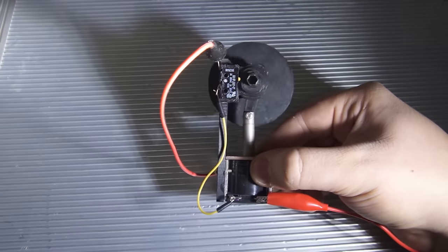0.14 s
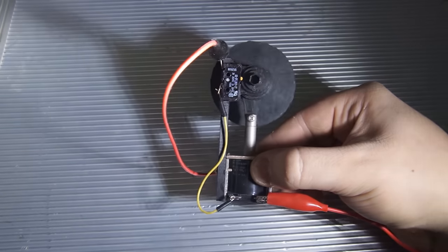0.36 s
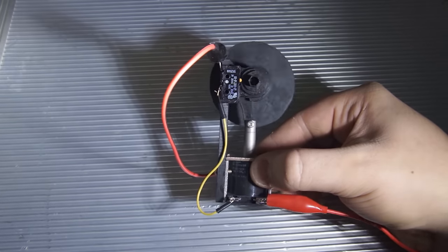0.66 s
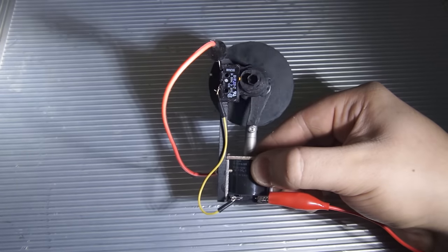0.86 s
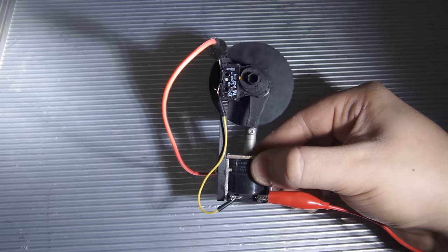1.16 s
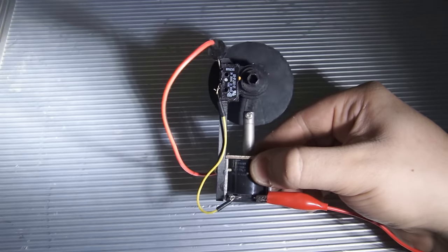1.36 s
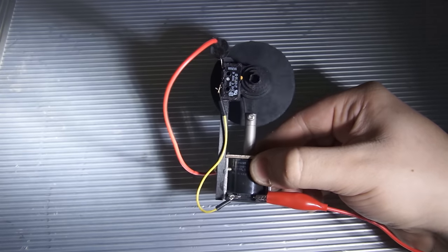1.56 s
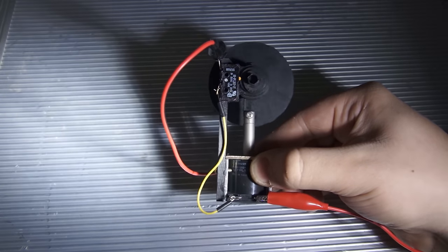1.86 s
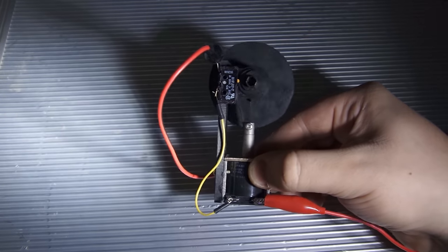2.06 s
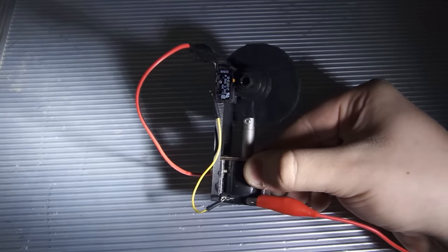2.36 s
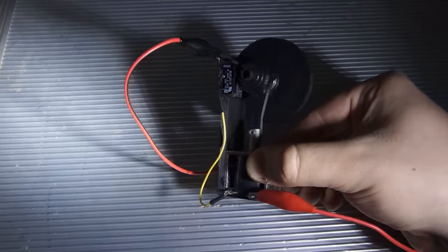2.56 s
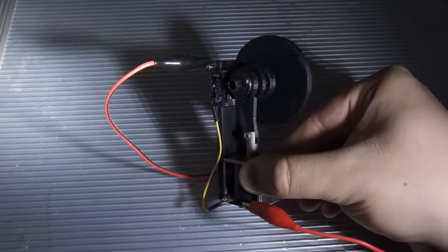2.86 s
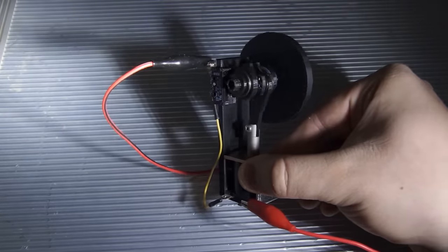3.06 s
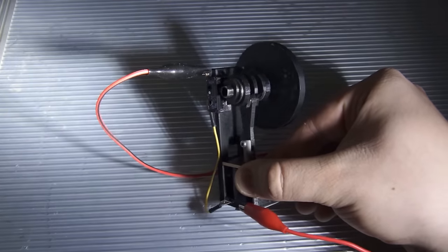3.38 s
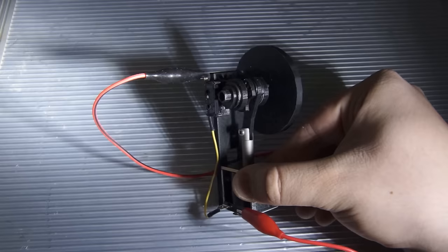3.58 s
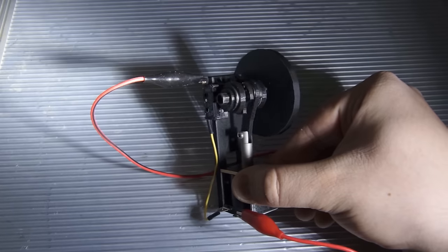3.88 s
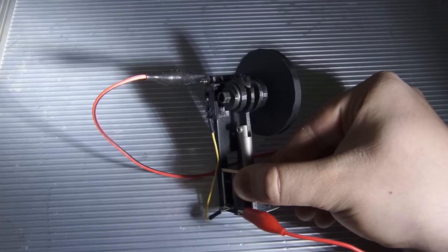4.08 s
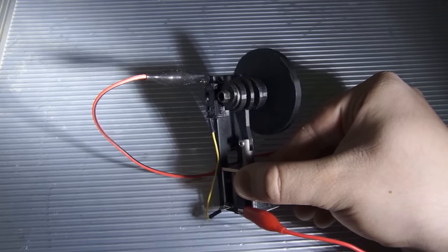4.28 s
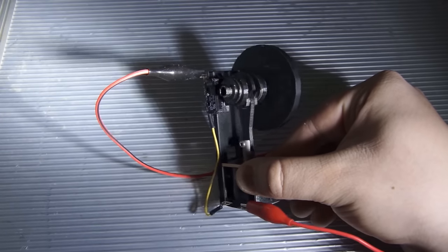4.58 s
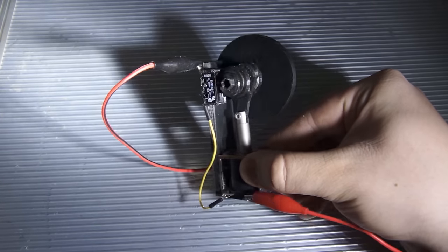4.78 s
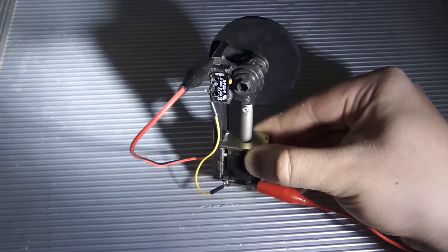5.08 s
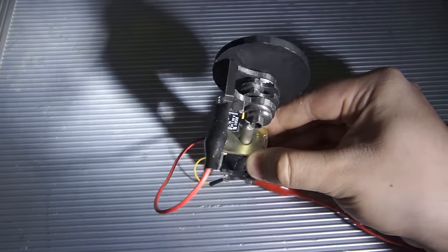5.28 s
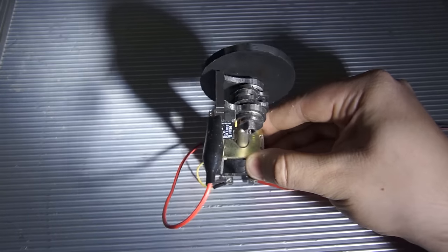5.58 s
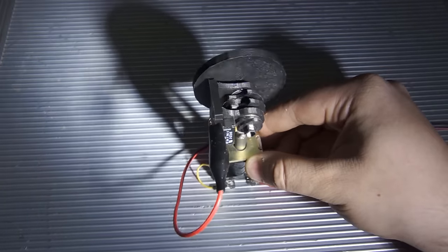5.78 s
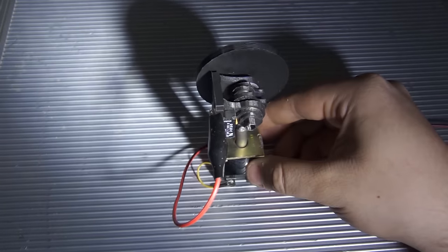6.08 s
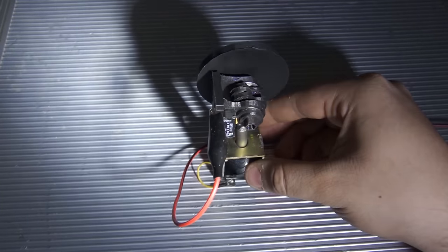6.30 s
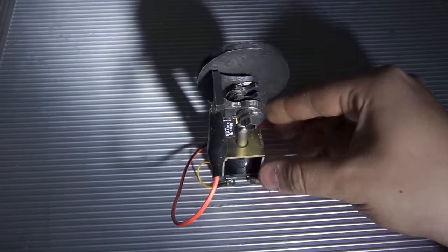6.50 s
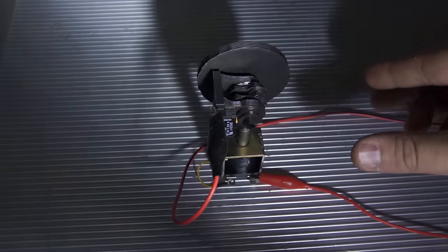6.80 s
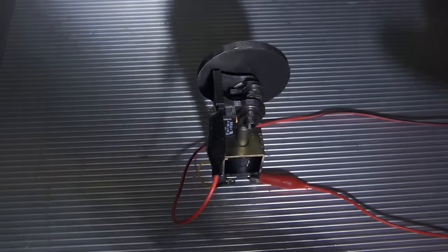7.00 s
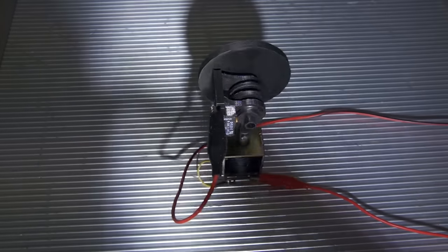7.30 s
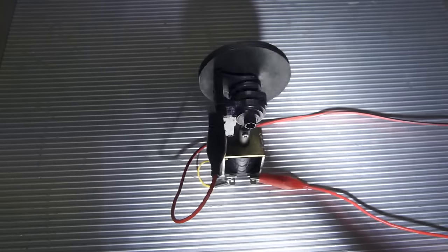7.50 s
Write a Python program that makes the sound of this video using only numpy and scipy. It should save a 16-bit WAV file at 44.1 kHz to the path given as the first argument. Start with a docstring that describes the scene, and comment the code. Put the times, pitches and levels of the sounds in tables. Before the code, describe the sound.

A small hand-held solenoid engine clicks steadily three to four times a second, scraping and rattling, then thumps rhythmically once stood on a bench.

```python
"""A small solenoid engine turns over in the hand, close up, three to four turns a second, first lying flat.
In every turn the plunger scrapes in its sleeve, the loose linkage rattles and knocks across its play, and a
cam presses a microswitch, lets it snap back, and the rod lands. The parts ring as sets of resonant modes.
Then the engine is tilted and rattles more, after one light bump on the bench. Near the end it is stood on
the bench with a thump: it runs a little faster, every stroke thumps the bench top and the rattling eases."""
import sys
import numpy as np
from scipy import signal
from scipy.fft import rfft, irfft
from scipy.io import wavfile
from scipy.ndimage import uniform_filter1d

SR = 44100
rng = np.random.default_rng(int(sys.argv[2]) if len(sys.argv) > 2 else 0)


def unload_audio(sound):
    """Save the sound as a 16-bit wav file, at the path given as the first command line argument."""
    columns = np.transpose(np.atleast_2d(sound))
    # keep every value between -1 and 1, then stretch to whole-number steps
    steps = np.round(np.clip(columns, -1, 1) * 32767)
    wavfile.write(sys.argv[1], SR, steps.astype(np.int16))


N = 337365
CLICK_T = np.arange(int(0.04 * SR)) / SR  # time axis of one contact, s
LONG_T = np.arange(int(0.5 * SR)) / SR  # time axis of pulls and thumps, s
TOP_HZ = 15900  # upper edge of the sound
# The engine lies flat, is tilted, then stands upright; triples hold one value for each pose.
POSE_CHANGES_S = [2.9, 5.8]
RING_SCATTER = 0.0099  # from turn to turn, as a share of the pitch
BEDDING_DB_PER_S = 4  # once stood up, the engine beds down and rattles less

# The switch snaps back, once a turn: start_s, level_db, spring_ring_hz
SNAPS = [(0.1911, -30, 8540), (0.4915, -30.5, 8100), (0.826, -31, 8500), (1.1278, -30, 8500),
         (1.417, -30, 8300), (1.6974, -31, 8300), (1.9672, -30.5, 7970), (2.2394, -30.5, 8300),
         (2.5115, -30, 8600), (2.79, -31, 8570), (3.0672, -29.5, 9500), (3.3376, -32.5, 9530),
         (3.605, -31, 9440), (3.8973, -32, 9440), (4.19, -30.5, 8660), (4.4812, -30.5, 9500),
         (4.8091, -30, 8600), (5.1173, -28.5, 9540), (5.419, -33, 9310), (5.697, -34, 9470),
         (5.9562, -32.5, 9130), (6.207, -33, 9070), (6.4417, -32, 9100), (6.6681, -31, 8730),
         (6.8879, -32.5, 9270), (7.1029, -30.5, 9200), (7.32, -32.5, 8900), (7.5384, -31, 9100)]
# Modes of the steel frame and plunger: pitch_hz, width_hz, level_db
FRAME_MODES = [(575, 230, -17.5), (1500, 1170, -22.5), (2666, 230, -9.5), (3080, 370, -10.5),
               (4320, 540, -13), (5100, 220, -11), (5790, 220, -13.5), (6840, 53, -6.5)]
# Modes of the switch spring and case: pitch_hz, width_hz, level_db
SPRING_MODES = [(8210, 180, 0), (9655, 580, 8), (9560, 870, 8), (11770, 1100, -5.5), (14770, 1500, -3.5),
                (14100, 520, -11), (16000, 1900, -11)]
UPPER_HZ, UPPER_DB = (11800, 12700, 14300), (3.5, -3, -7)  # the snap's upper ring
SNAP_TREBLE_DB = (17, 11.5, 28)  # against the body
PRESS_DB = (-39, -40.5, -40)  # before the engine beds down
PRESS_HZ, PRESS_TREBLE_DB = (3780, 3560, 4650), (5.5, 2.5, 2)
PRESS_LEAD = 0.249  # share of a turn by which the press comes before the snap


def switch(lead_db=-9, settle_db=-23, upper_scatter=0.057):
    """The switch is pressed gently; on release its blade unlatches, slams over and settles."""
    out = np.zeros(N)
    chance = rng.standard_normal((len(SNAPS), 4))
    for turn, (snap, db, spring_hz), (late, size, lever_detune, blade_detune) in zip(turns(), SNAPS, chance):
        pose, _, _, press, _ = turn

        lever = [(PRESS_HZ[pose] * (1 + RING_SCATTER * lever_detune), 300, 2)]
        touch = contact(chatter_s=0.0026, first=2.0)
        press_db = PRESS_DB[pose] - 0.3 * bedded_db(snap)
        press_spring = SPRING_MODES + [(14400, 1060, -0.62)]
        add(out, press, click(touch, press_db, FRAME_MODES + lever, press_spring, PRESS_TREBLE_DB[pose]))

        unlatch = contact(chatter_s=0.0016, first=0.5)
        unlatch_spring = SPRING_MODES + [(13200, 380, 9.2)]
        add(out, snap - 0.0027, click(unlatch, db + lead_db, FRAME_MODES, unlatch_spring, treble_db=11))

        slam = contact(chatter_s=0.0017, first=3)
        upper_hz = UPPER_HZ[pose] * (1 + upper_scatter * blade_detune)
        blade = [(upper_hz, 550, UPPER_DB[pose]), (spring_hz, 380, 6)]
        add(out, snap, click(slam, db, FRAME_MODES, SPRING_MODES + blade, SNAP_TREBLE_DB[pose]))

        settle = contact(chatter_s=0.013, first=0.41)
        settled = click(settle, db + settle_db + 2 * size, FRAME_MODES, SPRING_MODES, treble_db=-17)
        add(out, snap + 0.0069 + 0.0016 * late, settled)
    return out


# Now and then the rod catches and knocks harder; the row at 5.851 s is the knock as the engine is set down on
# the bench: # start_s, level_db (before the linkage trim), ring_hz, treble_db (against the body)
CATCHES = [(0.114, -42, 5200, -6), (0.384, -42, 5270, -25), (0.409, -40, 5540, -12),
           (0.691, -44, 5290, -23), (1.014, -43, 4970, -26), (1.338, -38.5, 4830, -18),
           (1.604, -43, 5660, -15), (2.165, -44, 4940, -8), (2.436, -39, 4930, -21),
           (2.712, -39, 4760, -15), (2.723, -39.5, 5020, -18), (3.015, -43.5, 4900, -15),
           (3.191, -48.5, 5220, -9), (3.902, -41, 2780, -18), (4.135, -44, 6000, -23),
           (4.373, -45.5, 5080, -17), (4.425, -45, 3200, -16), (4.685, -44.5, 4950, -10),
           (4.744, -44, 5900, -25), (5.009, -42, 5000, -14), (5.131, -41.5, 5330, -2),
           (5.334, -38.5, 5250, -1), (5.426, -38, 5240, 5), (5.594, -45, 3300, -32),
           (5.601, -41, 5150, -24), (5.851, -44, 2680, -31), (5.865, -35.5, 5000, -30)]
# The crank crosses its play at the same places in every turn:
# lead (share of a turn before the snap), ring_hz, treble_db (against the body),
# flat_db, tilted_db, upright_db (levels before trim, scatter and bedding down)
PLAY = [(.372, 5020, -22, -50, -51, -48), (0.35, 5210, -30, -55, -53, -41.5),
        (.275, 5050, -8.5, -51, -54, -49), (.197, 6300, -14, -62, -50, -43),
        (0.09, 5120, -26, -57, -60, -63)]
PLAY_SCATTER_S, PLAY_SCATTER_DB = 0.0015, 5.5  # from turn to turn
CATCH_WINDOW_S = 0.009
REBOUND_S, REBOUND_HZ = (0.0078, 0.0068, 0.019), (5160, 5050, 5950)  # the rod lands after the snap
REBOUND_DB = (-37, -43.5, -54)  # before the linkage trim


def linkage(trim_db=-1.5, rebound_treble_db=-10, rattle_treble_db=-8):
    """The crank and rod knock across their play and land after each snap, with a fine rattle in each pull."""
    out = np.zeros(N)
    for s, db, hz, treble_db in CATCHES:
        add(out, s, knock(db + trim_db, hz, treble_db))

    for pose, length, _, _, snap in turns():
        chance = rng.standard_normal((len(PLAY), 3))
        for (lead, hz, treble_db, *pose_db), (late, size, detune) in zip(PLAY, chance):
            crossing = snap - lead * length
            if min(abs(crossing - catch[0]) for catch in CATCHES) < CATCH_WINDOW_S:
                continue  # a hard catch takes the place of the ordinary knock
            db = pose_db[pose] + trim_db - bedded_db(snap) + PLAY_SCATTER_DB * size
            crossing_knock = knock(db, hz * (1 + RING_SCATTER * detune), treble_db)
            add(out, crossing + PLAY_SCATTER_S * late, crossing_knock)
        landing = knock(REBOUND_DB[pose] + trim_db, REBOUND_HZ[pose], rebound_treble_db)
        add(out, snap + REBOUND_S[pose], landing)

    for _, _, start, _, snap in turns():
        count = int((snap - start) * SR * 0.87)
        taps = slips(len(LONG_T), rate=230, spread_db=2.5)[:count]
        taps = taps * signal.windows.tukey(count, 0.3)
        force = signal.fftconvolve(taps, contact(chatter_s=0.0013, first=0.69))  # each tap chatters a little
        body = level(ring(force, FRAME_MODES), 0)
        treble = level(ring(force, SPRING_MODES[:4]), rattle_treble_db)
        add(out, start, level(body + treble, pull_levels(snap)[1]))
    return out


def knock(db, hz, treble_db):
    """One steel-on-steel knock in the linkage."""
    force = contact(chatter_s=0.00082, first=5.4)
    return click(force, db, FRAME_MODES + [(hz, 260, 8)], SPRING_MODES, treble_db)


# Modes of the plunger rubbing in its sleeve: pitch_hz, width_hz, level_db
SLEEVE_MODES = [(3540, 860, -7), (4110, 640, 0), (4820, 720, 1), (5380, 240, 7.5), (9270, 600, -7.5),
                (11700, 2100, -22)]


def plunger(trim_db=-1, coast_db=-10):
    """The plunger sticks and slips in its sleeve until the switch is pressed, then coasts more quietly."""
    out = np.zeros(N)
    for _, _, start, press, snap in turns():
        slide = max(press - start, 0.01)
        pressure_db = np.interp(LONG_T, [0, slide / 2, slide, slide + 0.006], [-2, 0, -1, coast_db])
        force = slips(len(LONG_T), rate=7000, spread_db=2.5)
        grip = uniform_filter1d(rng.standard_normal(len(LONG_T)), size=130)  # comes and goes within milliseconds
        force = force * undb(3.5 * level(grip, 0))
        scrape_db = pull_levels(snap)[0] + trim_db
        scrape = level(ring(force, SLEEVE_MODES), scrape_db, size=int(slide * SR))
        coast = np.exp(-np.maximum(LONG_T - slide, 0) / 0.018)
        add(out, start, scrape * undb(pressure_db) * coast)
    return out


# The pull changes as the engine is tilted: start_s, slide_lead (share of a turn that the slide
# starts before the snap), scrape_db (before the plunger's trim and pressure), rattle_db
PULL = [(.19, 0.66, -54.5, -79), (2.0, 0.64, -51.5, -71), (2.79, .61, -52, -69), (3.07, .49, -58.5, -63.5),
        (4.2, .48, -64, -59), (4.8, 0.46, -58.5, -58), (5.42, 0.58, -59.5, -70), (5.7, .39, -57, -80),
        (7.54, .395, -64, -64.5)]


def pull_levels(s):
    """Scrape and rattle dB of the turn that ends at time s."""
    times, _, scrape_db, rattle_db = np.transpose(PULL)
    return np.interp(s, times, scrape_db), np.interp(s, times, rattle_db)


def turns():
    """Each turn as (pose, length s, start of the slide s, press s, snap s)."""
    snap = np.array(SNAPS)[:, 0]
    length = np.diff(snap)
    length = np.r_[np.median(length), length]
    pose = np.searchsorted(POSE_CHANGES_S, snap)
    slide_lead = np.interp(snap, *np.transpose(PULL)[:2])
    return list(zip(pose, length, snap - slide_lead * length, snap - PRESS_LEAD * length, snap))


def bedded_db(s):
    """The bedding down reached by time s, growing steadily once the engine stands."""
    return BEDDING_DB_PER_S * max(s - POSE_CHANGES_S[-1], 0)


# The base bumps the bench: start_s, level_db, contact_s
BUMPS = [(2.569, -50.5, 0.00092), (5.8509, -28, 0.001)]


def bench(stroke_db=-27.5, rebound_s=0.0083, rebound=0.45, rattle_db=-38.5,
          sway_db=-46, sway_hz=42, sway_s=0.15):
    """The base bumps the bench; once it stands there, each pull rattles the top and each stroke thumps it."""
    out = np.zeros(N)
    for s, db, seconds in BUMPS:
        add(out, s, level(board(push(seconds), damping=1.56, tilt_db=4.0), db, size=900))

    foot = push(0.001)[:45]
    for _, _, start, _, snap in turns():
        if snap < BUMPS[-1][0]:
            continue
        blow = push(seconds=0.0034)
        force = blow + rebound * np.roll(blow, int(rebound_s * SR))  # the base rocks and lands twice
        add(out, snap - 0.0018, level(board(force, damping=1, tilt_db=0), stroke_db, size=900))

        sway = np.sin(2 * np.pi * sway_hz * LONG_T) * np.exp(-LONG_T / sway_s)  # the whole bench sways
        add(out, snap, undb(sway_db) * sway)

        # the feet chatter through the pull and again briefly after the stroke
        pull = np.interp(LONG_T, [0, 0.026, 0.04, 0.058], [0.8, 1, 0.5, 0])
        after = np.exp(-LONG_T / 0.013)
        for s, shape, db in [(start + 0.021, pull, rattle_db), (snap, after, rattle_db - 5)]:
            buzz = np.convolve(slips(len(LONG_T), rate=700, spread_db=1.5) * shape, foot)
            chatter = board(buzz, damping=1.1, tilt_db=2.8)
            add(out, s, level(chatter, db - 0.4 * bedded_db(snap), size=2000))
    return out


# Modes of the bench top: pitch_hz, width_hz (before damping), level_db (before the tilt)
BENCH_MODES = [(109.7, 46, 1), (133.1, 17.2, 9), (205, 20, -4), (318, 26, -6), (410, 40, -14.5),
               (526, 36, -22), (655, 32, -15), (870, 46, -21), (1300, 330, -15.5)]


def board(force, damping, tilt_db):
    """The bench top, all modes pushed the same way; a hard contact tilts them up by tilt_db an octave."""
    out = 0
    for hz, width, db in BENCH_MODES:
        tilted_db = db + tilt_db * np.log2(hz / BENCH_MODES[0][0])
        out = out + ring(force, [(hz, damping * width, tilted_db)])
    return out


# Soft handling thuds: start_s, level_db, pitch_hz, t60_s
THUDS = [(2.839, -37.5, 38.6, 0.3), (2.959, -39.5, 30.6, 0.59), (3.411, -51, 45.8, 0.25),
         (5.866, -24, 45.2, 0.14), (5.981, -27, 29.7, 0.51), (6.731, -38, 33.6, 0.67)]


def hand(recoil_db=-59):
    """Handling thuds are dying low tones; at first each stroke's recoil also nudges the bench top."""
    out = np.zeros(N)
    for snap, _, _ in SNAPS:
        if snap < BUMPS[0][0]:  # until it is lifted, the engine leans lightly on the bench
            add(out, snap, level(board(push(seconds=0.0056), damping=0.93, tilt_db=0), recoil_db, size=900))
    for s, db, hz, t60 in THUDS:
        decay = np.exp(-np.log(1000) * LONG_T / t60)
        add(out, s, -undb(db) * np.sin(2 * np.pi * hz * LONG_T) * decay)
    return out


# Colour of the quick reflections: pitch_hz, level_db
REFLECTION_COLOUR = [(60, 4), (300, 12.5), (1000, 4), (3000, 2), (5300, -2.5), (7400, -20), (9300, -6),
                     (15500, -24)]
# The room's tail, band by band: low_hz, high_hz, level_db, t60_s
TAIL_BANDS = [(80, 325, -18.5, 0.36), (400, 900, -9.5, 0.32), (1550, 4380, -11, 0.28),
              (4400, 6060, -11, 0.21), (6450, 10900, -11.5, 0.22), (11100, 21000, -9.5, 0.16)]


def room(x, early_db=-14, early_s=0.0051):
    """Quick reflections off the bench and hand, then the diffuse tail of a small room."""
    onset = np.clip((CLICK_T - 0.002) / 0.0013, 0, 1)
    early = stereo(rng.standard_normal((2, len(CLICK_T))), side_db=-40.0)
    early = colour(early * onset * np.exp(-CLICK_T / early_s), REFLECTION_COLOUR)
    early = level(early, early_db) / np.sqrt(len(CLICK_T))
    out = signal.fftconvolve(x[None], early, axes=1)[:, :N]
    for low_hz, high_hz, db, t60 in TAIL_BANDS:
        band = signal.butter(3, [low_hz, high_hz], "band", fs=SR, output="sos")
        keep = 1000 ** (-2 / (t60 * SR))
        energy = signal.sosfilt(band, x) ** 2
        stored = signal.lfilter([1 - keep], [1, -keep], energy)  # energy fills the room and leaks away
        diffuse = signal.sosfilt(band, stereo(rng.standard_normal((2, N)), side_db=-5))
        out = out + level(diffuse, db) * np.sqrt(stored)
    return out


# Colour of the room noise: pitch_hz, density_db (relative, per Hz)
FLOOR_COLOUR = [(20, 4.5), (40, -6.5), (70, -12.5), (150, -15.5), (400, -23), (1200, -26), (3000, -37.5),
                (8000, -38.5), (15000, -47)]
FLOOR_DB = -61
RUMBLE_DB = (-42, -46.5, -39.5)  # deep rumble in each pose


def background():
    """Quiet room noise over a deep rumble that changes with the pose, stronger on the right."""
    hiss = stereo(rng.standard_normal((2, N)), side_db=-4.0)
    hiss = level(colour(hiss, [(4, -26)] + FLOOR_COLOUR), FLOOR_DB)
    deep = stereo(rng.standard_normal((2, N)), side_db=-7.0)
    deep = colour(deep, [(4, -7.5), (10, -2.0), (14, 5), (20, -17.5), (50, -73), (200, -120)])
    deep = level(deep * undb(np.array([[-5], [0]])), 0)
    pose = np.searchsorted(POSE_CHANGES_S, np.arange(N) / SR)
    rumble_db = np.array(RUMBLE_DB, float)[pose]
    return hiss + deep * undb(uniform_filter1d(rumble_db, size=8000))


def contact(chatter_s, first):
    """Hard parts meet with one sharp blow, then chatter to rest."""
    force = rng.standard_normal(len(CLICK_T)) * np.exp(-CLICK_T / chatter_s)
    force[0] += first
    return force


def click(force, db, frame, spring, treble_db):
    """One contact rings the frame and, higher up, the switch; its level is that of the first 4 ms."""
    body = level(ring(force, frame), 0, size=165)
    treble = level(ring(force, spring), treble_db, size=165)
    return level(body + treble, db, size=165)


def slips(count, rate, spread_db):
    """Random tiny impacts, rate per second, mostly weak and a few strong."""
    hits = rng.random(count) < rate / SR
    return hits * rng.standard_normal(count) * undb(spread_db * rng.standard_normal(count))


def push(seconds):
    """A soft blow: half a sine of force."""
    return np.sin(np.pi * np.minimum(LONG_T / seconds, 1))


def ring(force, modes):
    """A force rings a set of (Hz, width, dB) modes; neighbours swing in opposite senses."""
    out = 0
    for k, (hz, width, db) in enumerate(modes):
        b, a = signal.iirpeak(min(hz, SR / 2 - 1), hz / width, SR)
        out = out + (-1) ** k * undb(db) * signal.lfilter(b, a, force)
    return out


def undb(db):
    """Decibels to gain."""
    return 10 ** (np.asarray(db) / 20)


def level(x, db, size=None):
    """Scale x so that its first size samples have this rms level."""
    return x * undb(db) / np.sqrt(np.mean(x[..., :size] ** 2) + 1e-20)


def add(track, s, x):
    """Mix x into the track from time s on."""
    i = max(int(round(s * SR)), 0)
    track[i:i + len(x)] += x[:max(len(track) - i, 0)]


def colour(x, points):
    """Shape a noise with a (Hz, dB) curve."""
    hz, db = np.transpose(points)
    f = np.maximum(np.fft.rfftfreq(x.shape[-1], 1 / SR), 1)
    gain = undb(np.interp(np.log(f), np.log(hz), db))
    return irfft(rfft(x) * gain, x.shape[-1])


def stereo(pair, side_db):
    """Left and right from a mid and a side signal."""
    return pair[0] + undb(side_db) * pair[1] * np.array([[1], [-1]])


def ports(x, lag_rad=1.0, pan_db=1, steepness=1.8):
    """Toward the top of the treble the left port hears the engine a little later and louder than the right."""
    height = (np.fft.rfftfreq(N, 1 / SR) / TOP_HZ) ** steepness
    height = height * np.array([[1], [-1]]) / 2  # half the difference on each side
    return irfft(rfft(x) * undb(pan_db * height) * np.exp(-1j * lag_rad * height), N)


def scene(bench_side_db=-16):
    """The engine's metal sounds and the bench's thumps, close by in a quiet room."""
    metal = switch() + linkage() + plunger()
    thumps = bench() + hand()
    far_edge = np.roll(thumps, int(0.00214 * SR))  # the wide top also radiates from the side, slightly later
    direct = ports(metal) + stereo([thumps, far_edge], bench_side_db)
    return direct + room(metal + thumps) + background()


def record(dry):
    """A steep elliptic low-pass cuts the top."""
    return signal.sosfilt(signal.ellip(10, 0.2, 80, TOP_HZ, fs=SR, output="sos"), dry)


dry = scene()
out = record(dry)
unload_audio(out)
```